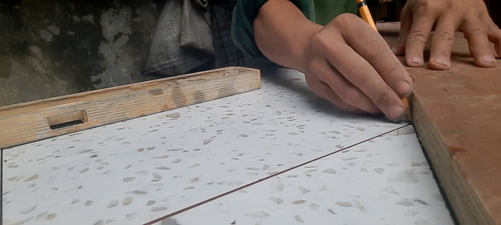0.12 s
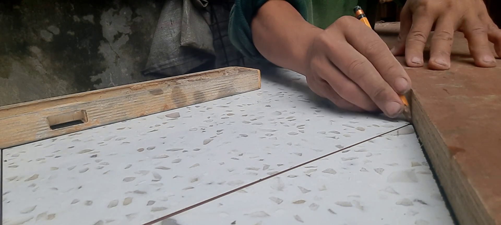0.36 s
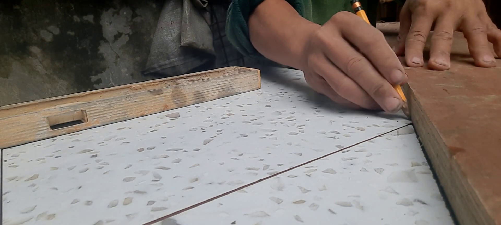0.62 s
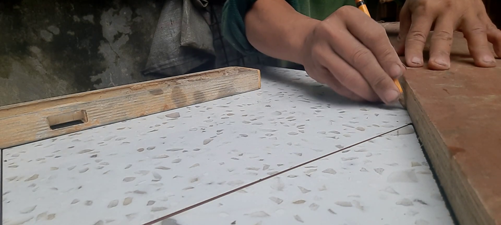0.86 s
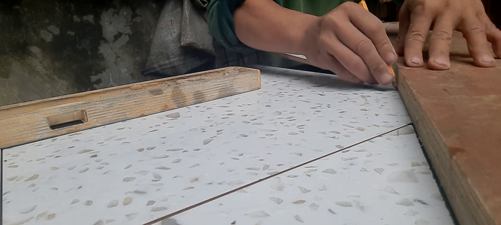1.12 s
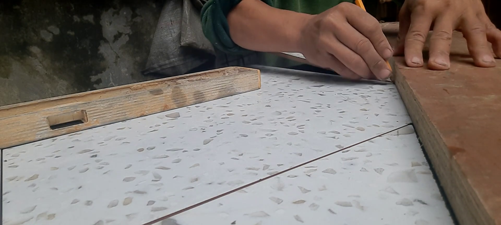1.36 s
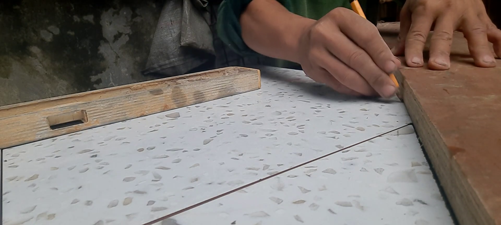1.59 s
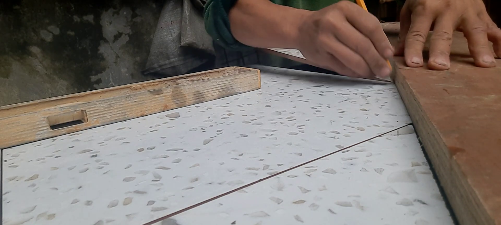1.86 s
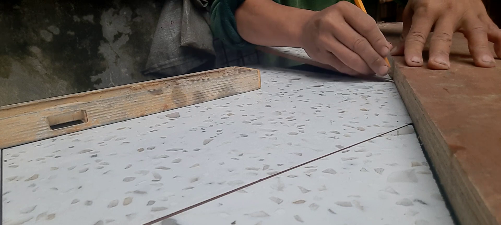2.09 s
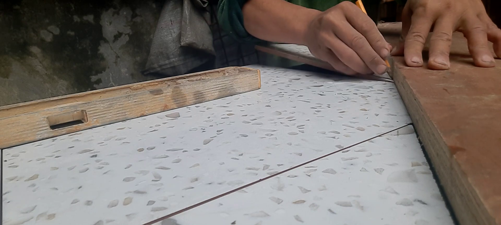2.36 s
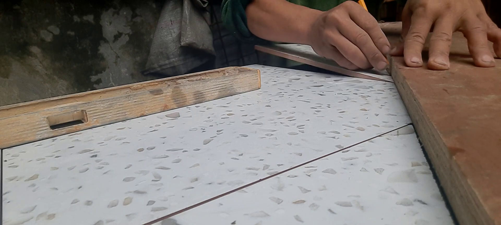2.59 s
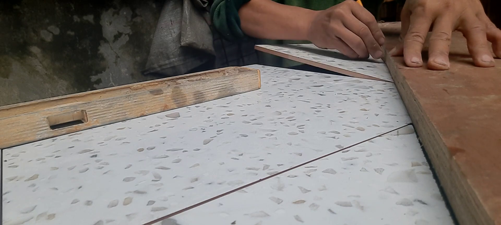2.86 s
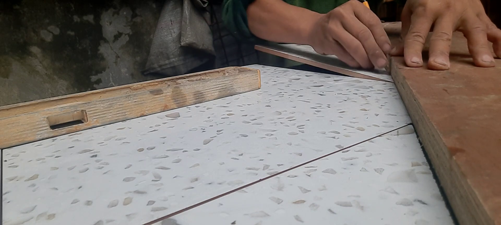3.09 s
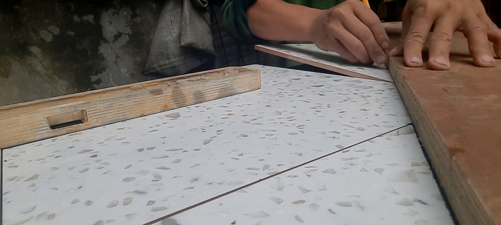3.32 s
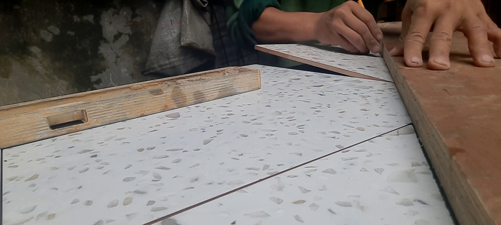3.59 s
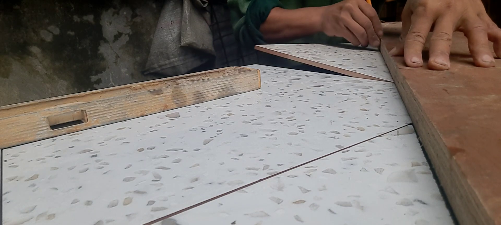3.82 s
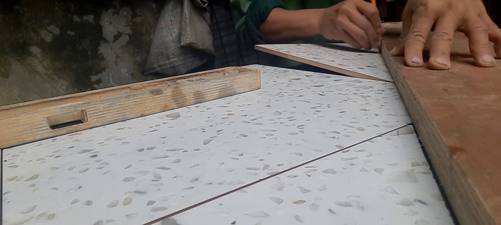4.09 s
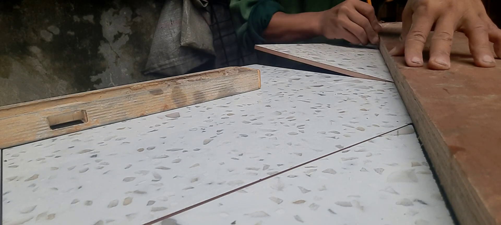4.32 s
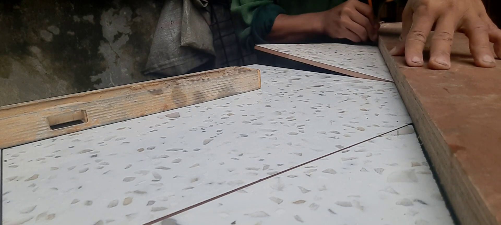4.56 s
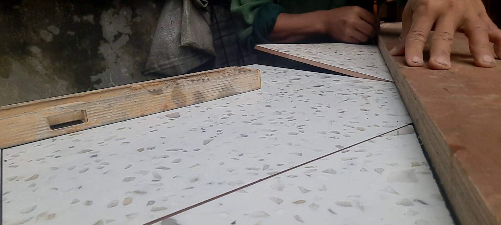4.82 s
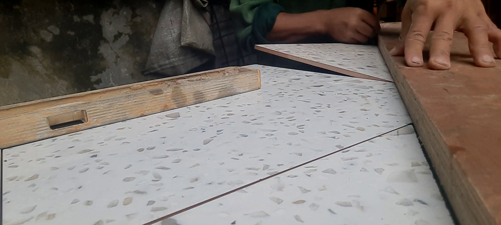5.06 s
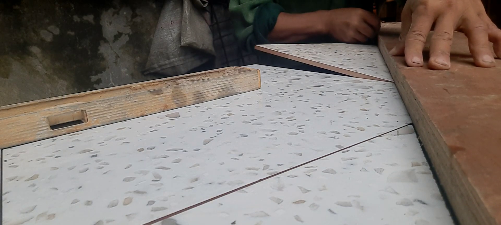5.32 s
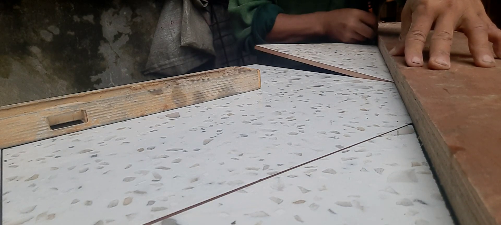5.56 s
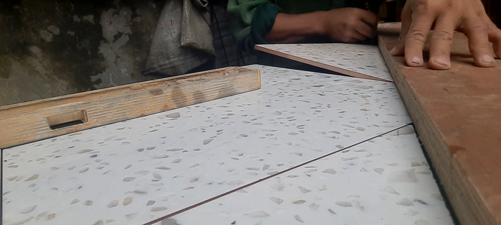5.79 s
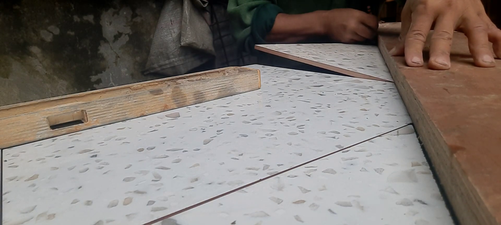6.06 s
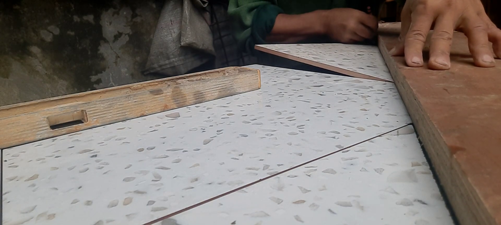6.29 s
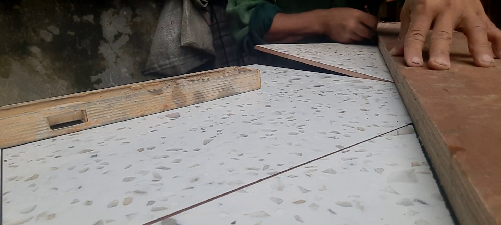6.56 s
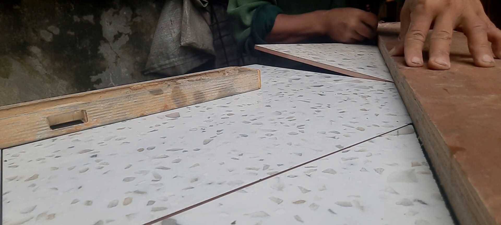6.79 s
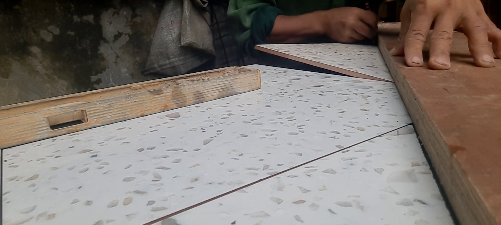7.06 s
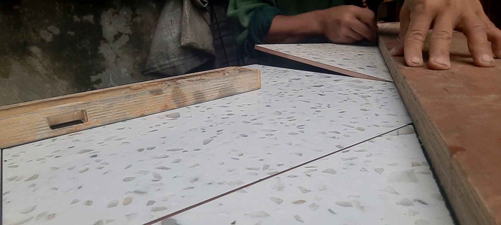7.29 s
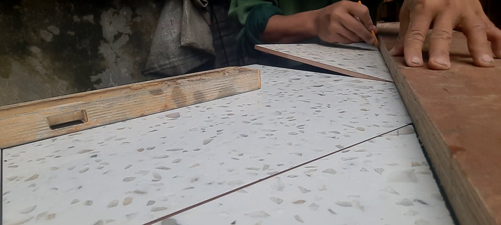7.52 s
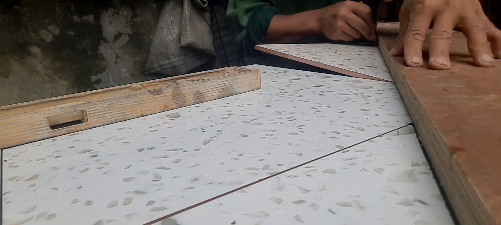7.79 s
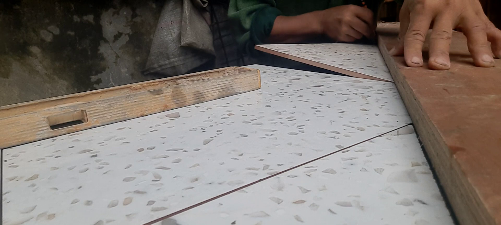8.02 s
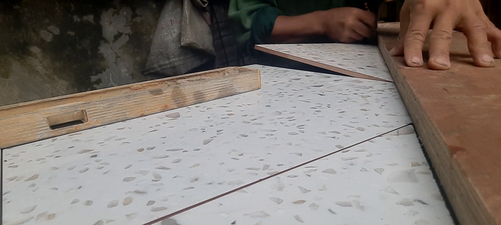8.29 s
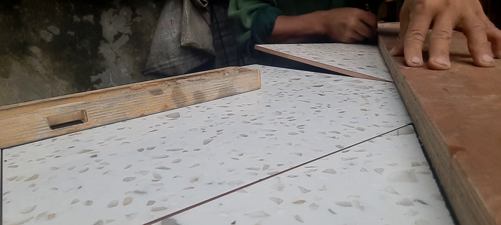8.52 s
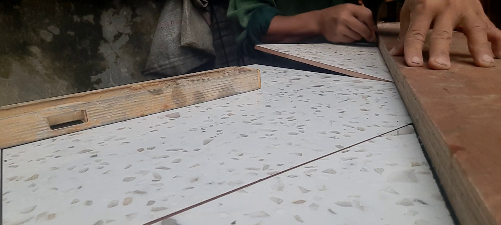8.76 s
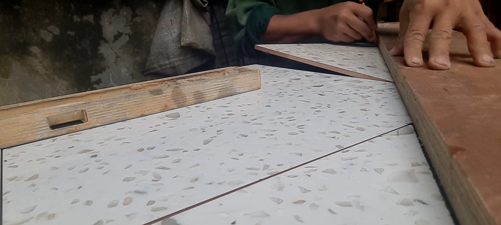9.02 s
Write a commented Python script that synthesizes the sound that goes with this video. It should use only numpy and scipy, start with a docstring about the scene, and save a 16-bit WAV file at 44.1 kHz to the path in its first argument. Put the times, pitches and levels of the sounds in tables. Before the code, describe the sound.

Faint, steady workshop noise with soft bass runs throughout, picked up close by a phone with dulled top treble. At 0 s a low bench rumble and dull little knocks start at once, fading by about 0.4 s into near quiet. From 1 to 1.6 s bright ceramic clicks cluster over gritty rubbing. Short ringing scrapes follow near 1.8, 2.7 and 3 s, a longer scratch around 3.3 to 3.6 s with a sharp tap at 3.4, and a quick bright stroke with several clacks at 4.2 to 4.5 s. Between 4.6 and 6.2 s only light rubs and faint ticks remain. A strong woody thud lands near 6.4 s, then small dull taps. Scratching returns at 7.4 s, with the strongest tile knock at 7.6 s and a ringing rub after it. Light knocks come near 8.1 and 8.45 s, then brief scrapes and clicks around 8.8 to 9 s. Each contact has a short room tail.

```python
"""A pencil pushed in short strokes along a straightedge over ceramic tiles on a wooden bench, close to a phone.
A workshop hums quietly throughout, as filtered noise. From the first instant, grit under the sliding contact
rings banks of tile and bench modes, while the bare contact hisses and the hand swishes as coloured noise.
Small knocks with dying tails join at once and recur to the end: bright tile knocks gather from about 1 to 4.5 s,
a strong bench thud comes near 6.4 s and the strongest tile knock near 7.6 s. A short room tail follows it all."""
import sys
import numpy as np
from scipy import signal
from scipy.fft import rfft, irfft
from scipy.io import wavfile

SR = 44100
rng = np.random.default_rng(int(sys.argv[2]) if len(sys.argv) > 2 else 0)


def linear_from_db(decibels):
    """Turn decibels (scalar or array-like) into linear amplitude factors; 0 gives 1."""
    return 10 ** (np.asarray(decibels, float) / 20)


def master(y):
    """Save y as 16-bit WAV."""
    cut = np.clip(np.atleast_2d(y).T, -1, 1)
    pcm = np.round(cut * 32767)  # scale
    wavfile.write(sys.argv[1], SR, pcm.astype(np.int16))


N = 403074
T = np.arange(N) / SR

# workshop air and microphone noise colour: (frequency [Hz], gain [dB])
SHOP_COLOUR = [(25, -40), (60, -1), (125, 0.5), (220, -11), (320, -1), (650, -4), (850, -6.5), (1100, -10),
               (1600, -2), (2200, -4), (3500, -9), (7000, -11.5), (16000, -12.5)]
SHOP_DB, SHOP_SWELL_DB = -55, 1  # level ahead of the microphone colour; spread of its slow swell

# slides, and the rumbling or ringing tails that die out after knocks:
# (full level [s], rise [s], hold [s], fall [s], tile ring [dB], bench rumble [dB])
SLIDES_AND_TAILS = [(0.0, .01, 0.0046, 0.14, -49.5, -32.5), (0.086, .05, 0.01, 0.27, -47.5, -46),
                    (0.462, 0.072, .01, 0.28, -74, -65.5), (0.943, 0.4, 0.12, 0.23, -51, -45),
                    (1.158, 0.54, 0.059, 0.26, -46, -43.5), (1.386, 0.067, 0.013, 0.14, -41.5, -46),
                    (1.48, 0.025, 0.033, 0.12, -48, -48), (1.553, 0.056, 0.065, 0.077, -52, -45),
                    (1.793, .12, 0.05, 0.033, -30.5, -36), (1.854, 0.025, .01, 0.19, -46, -49),
                    (2.049, .01, .01, 0.18, -46.5, -53), (2.648, 0.62, 0.011, 0.22, -49.5, -51.5),
                    (2.749, .15, 0.1, 0.1, -31.5, -35), (2.958, 0.019, 0.12, 0.033, -29.5, -41.5),
                    (3.109, 0.035, .02, 0.15, -48, -51), (3.268, .012, 0.027, .1, -60, -44),
                    (3.331, .12, 0.22, 0.16, -34, -40), (3.614, .05, 0.058, 0.27, -40.5, -48),
                    (3.758, 0.11, 0.11, 0.067, -46, -53.5), (3.961, .008, 0.037, 0.08, -74, -46.5),
                    (4.046, .02, 0.025, 0.2, -56.5, -42.5), (4.281, .1, 0.051, 0.043, -28.5, -56),
                    (4.358, 0.023, 0.061, 0.049, -32.5, -54), (4.446, .05, 0.017, .15, -45.5, -48.5),
                    (4.584, 0.14, 0.061, 0.073, -40, -57), (4.832, .01, .05, 0.16, -66, -44.5),
                    (5.218, 0.2, 0.068, 0.098, -69.5, -62), (5.402, 0.015, 0.0087, 0.46, -61, -51.5),
                    (5.711, .02, .01, 0.15, -52.5, -53.5), (6.0, 0.081, .01, 0.05, -44, -55.5),
                    (6.302, 0.054, .01, 0.078, -48.5, -68), (6.448, 0.012, 0.0082, 0.069, -65, -45),
                    (6.647, 0.015, 0.053, .04, -70, -48.5), (6.767, 0.018, 0.016, .25, -62.5, -49),
                    (7.009, 0.012, 0.0038, 0.055, -70, -52.5), (7.146, 0.41, 0.2, .1, -61, -76),
                    (7.292, 0.034, 0.02, 0.26, -58, -51), (7.398, .12, 0.076, 0.073, -40, -53),
                    (7.55, .03, 0.0084, 0.027, -49, -71), (7.632, 0.073, 0.0079, 0.15, -49, -47.5),
                    (7.709, 0.007, 0.011, 0.26, -37, -60), (7.753, .05, 0.05, 0.33, -47, -54.5),
                    (8.094, 0.04, .05, 0.16, -65, -47.5), (8.427, 0.026, 0.024, 0.2, -56.5, -42.5),
                    (8.67, 0.13, 0.032, .1, -58, -69), (8.792, 0.094, 0.024, 0.051, -39, -50),
                    (8.961, 0.034, 0.039, 0.047, -35, -68), (9.036, 0.14, 0.022, 0.23, -50.5, -52.5)]
SWELL_RANGE_DB = 30  # a swell rises and falls by this much in its rise and fall time
SWELL_ROUNDING = 1.036  # 1 = straight flanks in dB, more = round top and abrupt ends

# knocks and slips: (time [s], tile [dB], bench [dB], tick [dB], loudest region [Hz]);
# a region below the tile's modes lies in the bench
KNOCKS = [(0.011, -59, -40.5, -65, 1860), (0.093, -68, -32, -55, 1150), (0.132, -65, -32.5, -69, 870),
          (0.4436, -47, -64, -51.5, 2580), (1.151, -27.5, -42, -72, 1420), (1.365, -52, -37.5, -53, 2020),
          (1.393, -26, -70, -55, 1550), (1.472, -27.5, -38, -48, 1510), (1.485, -21.5, -40, -55, 1640),
          (1.549, -28, -68, -53, 1300), (1.784, -21.5, -53, -77, 1530), (2.052, -22.5, -70, -46, 1010),
          (2.51, -47, -55, -78, 1098), (2.616, -35, -41, -67, 1360), (2.937, -34, -58, -50, 1690),
          (2.952, -35, -60, -71, 1690), (3.122, -50, -49, -52, 1540), (3.324, -34, -52, -56, 1710),
          (3.39, -21, -66, -74, 1020), (3.957, -65, -44, -83, 1340), (4.032, -47, -66, -52.5, 1640),
          (4.048, -41, -39, -65, 2000), (4.21, -33, -62, -58, 1770), (4.256, -36, -60, -69, 1620),
          (4.312, -33, -43.5, -71, 1580), (4.364, -24.5, -57, -69, 1490), (4.412, -26.5, -65, -52, 1720),
          (4.444, -58, -38, -45, 1450), (4.788, -52, -75, -63, 2340), (4.8104, -36, -62, -53.5, 2600),
          (4.829, -44.5, -49, -63, 1550), (5.399, -51, -39, -74, 945), (5.695, -55, -68, -56, 1930),
          (5.854, -72, -44.5, -81, 1645), (5.907, -45, -59, -77, 1480), (5.955, -44, -97, -68, 1760),
          (6.303, -35, -69, -51, 935), (6.426, -30.5, -29.5, -46, 600), (6.6091, -32.5, -59, -49.5, 2870),
          (6.642, -65, -38, -60, 2620), (6.764, -47, -34.5, -66, 2180), (7.003, -66, -50, -54.5, 3140),
          (7.29, -50, -46, -69, 2040), (7.383, -36, -58, -76, 1350), (7.583, -31.5, -53, -73, 830),
          (7.606, -46, -75, -54.5, 1870), (7.629, -19, -65, -66, 1620), (7.704, -25, -70, -65, 1550),
          (7.722, -43, -72, -72, 1340), (8.084, -74, -46, -81, 1640), (8.4184, -39, -37.5, -53, 2540),
          (8.425, -60, -33, -60, 187), (8.465, -29, -49, -50, 2560), (8.945, -39, -76, -72, 1600),
          (8.957, -29, -86, -74, 1390)]
TILE_CHATTER_T60_S, BENCH_CHATTER_T60_S, TICK_CHATTER_T60_S = 0.036, 0.053, 0.034
BENCH_REGION_HZ = 342  # where the bench answers a knock on the tile

# the hand works at five places along the edge and moves on at these moments: time [s]
MOVES = [2.3, 3.94, 5.1, 7.58]
# bench and straightedge modes: (frequency [Hz], width [Hz])
BENCH_MODES = [(130, 45), (205, 45), (262, 18), (311, 25), (370, 35), (432, 28), (510, 40), (552, 25),
               (586, 11), (680, 45)]
# relative drive of each bench mode: (five columns, one for each place [dB],
# left minus right [dB], left lead [rad])
BENCH_DRIVE = [(-16, -10, -11, -12, -7.5, -10, 0.27), (-40, -14, -14, -12, -4.5, 0.5, -0.034),
               (-13.5, -3, -27, -50, -19.5, -16.5, -0.1), (-4, 9.5, 3.5, 0.5, 7, -2.5, 0.032),
               (-14, 0.5, -1, 6.5, -1, 0.5, 0.37), (-9, 7.5, -2.5, 2.5, 2.5, -4, -0.0078),
               (-6, 0, -3, 5, -3, 11, -0.75), (-16, 1, -17, -10.5, -53, 13, 0.044),
               (5.5, 6, -6, 6, 0, -3, 0.36), (-12.5, -3.5, -15, -7, -8, 17.5, -0.37)]
# tile modes: (frequency [Hz], width [Hz])
TILE_MODES = [(750, 22), (950, 16), (1020, 45), (1120, 16), (1330, 35), (1426, 20), (1482, 22), (1648, 30),
              (1700, 35), (1850, 30), (1995, 45), (2120, 40), (2340, 26), (2555, 45), (2680, 40),
              (3000, 50), (3310, 35), (3510, 35), (4150, 120), (4520, 50)]
# relative drive of each tile mode: (five columns, one for each place [dB],
# left minus right [dB], left lead [rad])
TILE_DRIVE = [(-10, -8.5, -8.5, 2.5, 0.5, 8, -0.6), (-11, -4.5, -13, -2, -7, 10.5, 3),
              (-13, -9.5, -47, -22, -4, -8, -2), (0.5, 4, 3, -1, 5.5, 2, -1.8),
              (-18, -9.5, -9.5, -18, -3, -14, -3.5), (-2, -12, 0.5, 0, 6, -6.5, -3),
              (0, -9, -28, -15, -10.5, -5, 1.6), (-3, -7, 1.5, -7, 1.5, 3.5, -1.5),
              (-10, -2.5, -2, -14.5, -3, -11.5, -0.5), (-12, -8, -13, -12, -22, 6, -0.5),
              (-1.5, -12.5, -6.5, -3, -6.5, -2, 1.5), (-17, -21, -11, -5, -30, 3, 0.94),
              (-7, -14, -8, -13, 0, -5, 2.7), (-15.5, -34, -24, -18, -35, -14, 5.5),
              (-6.5, -32, -28, -25, -44, 3.5, 2.5), (-8, -19.5, -13, -18, -19, 7.5, 2),
              (-12, -32, -17, -37, -27, -8, 6), (-16, -22, -16.5, -16, -28, 2, 4.5),
              (-29, -31, -32.5, -37, -57, 22, -4.5), (-32, -31, -23, -36, -48, -3.5, -1.5)]

# colour of the bare contact hiss: (frequency [Hz], gain [dB])
HISS_COLOUR = [(300, -47.5), (700, 18), (1500, 19), (2500, 16.5), (4000, 9.5), (5000, 4), (7000, 3.5),
               (16000, -3.5)]
# dB of hiss per dB of tile ring and of bench rumble; hiss drive were both at 0 dB
HISS_PER_TILE, HISS_PER_BENCH, HISS_DB = 0.37, 0.43, -21.5
PORT_LAG = 3  # samples by which the shared hiss reaches the left port late

# colour of the hand's swish: (frequency [Hz], gain [dB])
SWISH_COLOUR = [(3000, 2.5), (9000, 6.5), (11000, 14.5), (16000, 13.5)]
# extra swells of airy high swish, mostly over slides and knocks:
# (full level [s], rise [s], hold [s], fall [s], swish drive [dB])
SWISH_SWELLS = [(5.58, .6, 0.018, 0.18, -77), (5.695, 0.019, .02, .6, -63), (7.378, 0.28, 0.017, 0.17, -74),
                (8.48, 0.086, .02, 0.1, -73), (0.086, 0.11, .03, .2, -62), (1.004, 0.32, 0.34, .1, -70)]
SWISH_SLOPE, SWISH_DB = 0.34, -64  # dB of swish per dB of tile ring; swish drive at a -40 dB ring

ROOM_T60_S, ROOM_DB = .2, -12  # tail decay time; tail level beside the direct sound
# phone microphone response: (frequency [Hz], gain [dB])
MIC_COLOUR = [(30, 4), (70, -4), (115, -4.5), (7500, -1.5), (8400, -9), (9500, -23.5), (10500, -18.5),
              (11500, -19), (15500, -22.5)]


def unit(x):
    """Scale to rms 1."""
    return x / np.sqrt(np.mean(x ** 2))


def colour(x, table):
    """Causal minimum-phase filter through (frequency [Hz], gain [dB]) points, from the folded cepstrum."""
    hz, db = np.transpose(table)
    grid_hz = np.linspace(1, SR / 2, num=2049)
    log_gain = np.log(linear_from_db(np.interp(np.log(grid_hz), np.log(hz), db)))
    cepstrum = irfft(log_gain)
    cepstrum[1:2048] *= 2
    cepstrum[2049:] = 0
    impulse = irfft(np.exp(rfft(cepstrum)))
    return signal.oaconvolve(x, impulse[None], axes=1)[:, :N]


def walk(rate):
    """Random levels joined by straight lines, rate new ones a second; spread near 1."""
    knots = np.arange(0, N / SR + 1, 1 / rate)
    levels = rng.standard_normal(size=4000)[:len(knots)]
    return 1.2 * np.interp(T, knots, levels)


def shop():
    """Steady workshop air and microphone noise; the bass is mostly alike at both ports."""
    own, shared = rng.standard_normal((2, N)), rng.standard_normal((1, N))
    low, high = (signal.butter(1, 500, kind, fs=SR) for kind in ("low", "high"))
    treble = signal.lfilter(*high, own)
    bass = signal.lfilter(*low, 1.06 * shared + .5 * own)
    swell = linear_from_db(SHOP_DB + SHOP_SWELL_DB * walk(1.827))
    return swell * unit(colour(treble + bass, SHOP_COLOUR))


def swells(rows, db):
    """Level in dB of swells that rise, hold and fall; overlapping ones add in power."""
    t = T[::32]
    power = np.full(len(t), 1e-12)
    for (s, rise, hold, fall, *_), peak in zip(rows, db):
        before = (s - t) / max(rise, .002)
        after = (t - s - max(hold, 0)) / max(fall, .002)
        away = np.maximum(np.maximum(before, after), 0)
        power += linear_from_db(peak - SWELL_RANGE_DB * away ** SWELL_ROUNDING) ** 2
    return np.interp(T, t, 10 * np.log10(power))


def grit(spread_db, flutter_db, rate):
    """Dense grains of very unequal size; the pressure flutters as the contact sticks and slips."""
    size = linear_from_db(spread_db * rng.exponential(size=N) + flutter_db * walk(rate))
    return unit(size * rng.standard_normal(N))


def blows(db, blow_share, grains, t60):
    """Each knock is one impulse, blow_share strong, and a dying chatter of grains."""
    force = np.zeros(N)
    fall = np.exp(-np.log(1000) * np.arange(SR // 4) / SR / t60)
    for (s, *_), gain in zip(KNOCKS, linear_from_db(db)):
        start = int(s * SR)
        stop = min(start + len(fall), N)
        force[start:stop] += gain * fall[:stop - start] * grains[start:stop]
        force[start] += gain * blow_share
    return force


def ring(rub, knock, modes, drives, wander_db, rate, focus_db, focus_hz, band_hz):
    """Resonant modes, driven unevenly as the contact moves; each reaches the two ports in its own way."""
    out, power = np.zeros((2, N)), np.zeros(N)
    place = np.searchsorted(MOVES, T)
    # the knock now ringing, taken 1 ms early so its region is set before the blow
    latest = np.maximum(np.searchsorted(np.transpose(KNOCKS)[0], T + .001) - 1, 0)
    for (hz, width), (*db, pan_db, lead) in zip(modes, drives):
        pole = np.exp((2j * hz - width) * np.pi / SR)
        gain = linear_from_db(np.array(db))[place]
        # a knock lands elsewhere: it drives the modes more evenly, falling focus_db an octave from its region
        focus = linear_from_db(-focus_db * abs(np.log2(hz / focus_hz)))[latest]
        struck = gain ** .4 * focus
        rubbed = gain * linear_from_db(wander_db * walk(rate))
        drive = (rub * rubbed + knock * struck) * 2 * (1 - abs(pole))
        z = signal.lfilter([1], [1, -pole], drive)
        port_gain = linear_from_db(np.array([pan_db, -pan_db]) / 2)
        port_phase = np.exp([.5j * lead, -.5j * lead])
        out += np.imag(z * (port_gain * port_phase)[:, None])
        power += gain ** 2 * (1 - abs(pole))
    # the body radiates little outside the range of its modes
    radiation = signal.butter(3, band_hz, "band", fs=SR, output="sos")
    return signal.sosfilt(radiation, out / np.sqrt(power))


def bench_rumble(grains):
    """Coarse grains and thuds excite the low modes of bench and straightedge."""
    rub = linear_from_db(swells(SLIDES_AND_TAILS, np.transpose(SLIDES_AND_TAILS)[5])) * grains
    _, _, thud_db, _, region_hz = np.transpose(KNOCKS)
    thuds = blows(thud_db, 23.5, grains, BENCH_CHATTER_T60_S)
    focus_hz = np.where(region_hz < TILE_MODES[0][0], region_hz, BENCH_REGION_HZ)
    return ring(rub, thuds, BENCH_MODES, BENCH_DRIVE, wander_db=3.3, rate=6.2,
                focus_db=16, focus_hz=focus_hz, band_hz=[125, 1150])


def tile_ring(grains):
    """Fine grains and knocks excite the bright modes of the ceramic tile."""
    rub = linear_from_db(swells(SLIDES_AND_TAILS, np.transpose(SLIDES_AND_TAILS)[4])) * grains
    _, knock_db, _, _, region_hz = np.transpose(KNOCKS)
    knocks = blows(knock_db, 9, grains, TILE_CHATTER_T60_S)
    return ring(rub, knocks, TILE_MODES, TILE_DRIVE, wander_db=2.2, rate=18,
                focus_db=13, focus_hz=region_hz, band_hz=[520, 6000])


def contact_force(spread):
    """Noise and ticks at the bare contact; the noise follows both tile ring and bench rumble."""
    *_, tile_peak, bench_peak = np.transpose(SLIDES_AND_TAILS)
    hiss_peak = HISS_PER_TILE * tile_peak + HISS_PER_BENCH * bench_peak + HISS_DB
    rub = linear_from_db(swells(SLIDES_AND_TAILS, hiss_peak))
    tick_db = np.transpose(KNOCKS)[3]
    return np.array([rub * g + blows(tick_db, 5, g, TICK_CHATTER_T60_S) for g in spread])


def hand_swish(spread, force):
    """Airy noise that follows the slides, tails and extra swells, with a little of the contact force."""
    ring_led_db = SWISH_DB + SWISH_SLOPE * (np.transpose(SLIDES_AND_TAILS)[4] + 40)
    ring_led = linear_from_db(swells(SLIDES_AND_TAILS, ring_led_db))
    extra = linear_from_db(swells(SWISH_SWELLS, np.transpose(SWISH_SWELLS)[-1]))
    return colour((ring_led + extra) * spread + linear_from_db(-16.5) * force, SWISH_COLOUR)


def handling():
    """Rubbing and knocks drive bench, tile, the bare contact hiss and the hand's swish."""
    fine, coarse = grit(3.17, 1.16, 120), grit(1.8, 1.85, 40)
    # the hiss comes from the whole length of the edge, so the ports share only part of it
    shared = np.array([np.roll(fine, PORT_LAG), fine])
    own = np.array([grit(3.2, 0.59, 44) for _ in "LR"])
    spread = 0.56 * shared + 1.39 * own
    force = contact_force(spread)
    hiss = colour(force, HISS_COLOUR)
    return bench_rumble(coarse) + tile_ring(fine) + hiss + hand_swish(spread, force)


def room(x):
    """Short diffuse tail of decaying, softened noise, different at each port."""
    t = np.arange(SR // 3) / SR
    fall = np.exp(-np.log(1000) * t / ROOM_T60_S) * (t > .003)  # silent for the first 3 ms
    tail = rng.standard_normal((2, len(t))) * fall
    tail = signal.lfilter([.5], [1, -.45], tail)
    tail /= np.sqrt(np.sum(tail ** 2, axis=1, keepdims=True))
    return linear_from_db(ROOM_DB) * signal.oaconvolve(x, tail, axes=1)[:, :N]


def scene():
    """Handling in a small room over the workshop's hum."""
    near = handling()
    return near + room(near) + shop()


def top_cut(x):
    """Nothing passes above the cut-off."""
    return signal.sosfilt(signal.butter(12, 16510, fs=SR, output="sos"), x)


def record(dry):
    """The phone microphone colours the sound, chiefly by dulling the treble."""
    mix = colour(dry, MIC_COLOUR)
    return top_cut(mix)


dry = scene()
out = record(dry)
master(out)
```